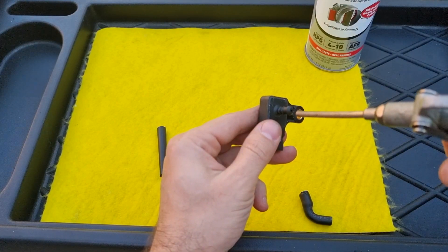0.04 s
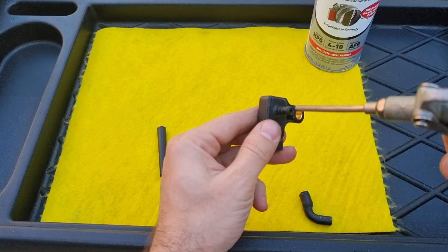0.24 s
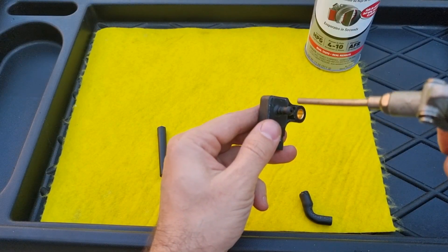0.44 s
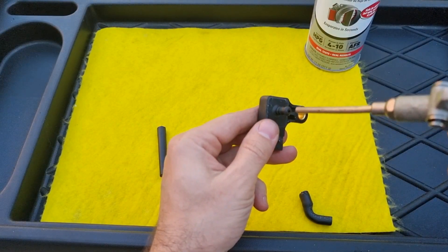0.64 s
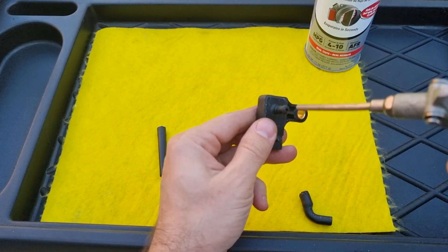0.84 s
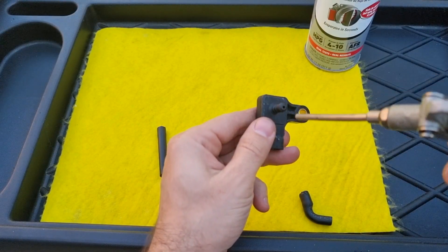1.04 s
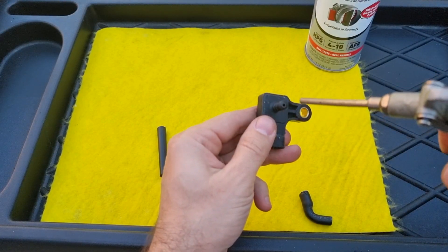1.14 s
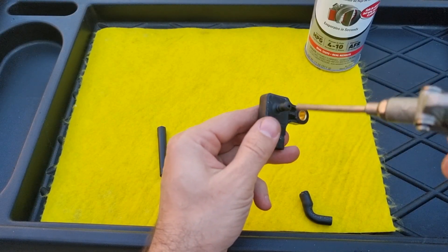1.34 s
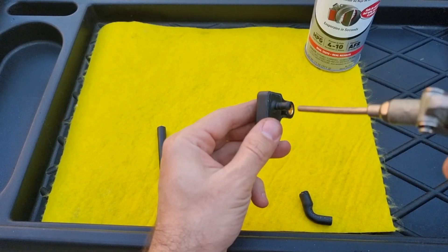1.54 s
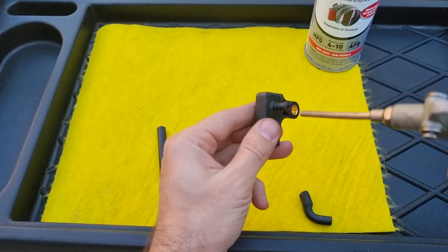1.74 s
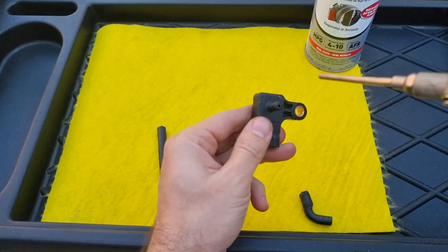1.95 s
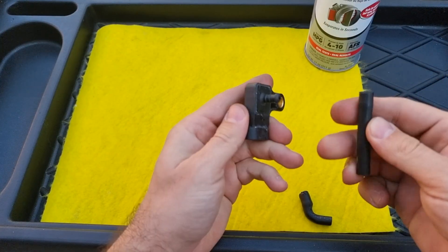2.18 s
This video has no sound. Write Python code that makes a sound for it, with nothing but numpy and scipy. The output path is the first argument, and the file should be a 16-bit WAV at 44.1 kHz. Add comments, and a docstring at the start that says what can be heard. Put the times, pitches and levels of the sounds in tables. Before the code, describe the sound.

Close up in a small garage, three strong bursts of pressurised air hiss and fizz with quick flicker and soft low pops, stopping sharply between; afterwards only quiet hum, low rumble and a light tap remain.

```python
"""A blow gun puffs three blasts of compressed air at a small plastic part: filtered noise shaped by a valve.
The jet roars softly, hisses and fizzes as it is waved about, and once sings over the part's open port;
each part of the jet is a band of noise with its own flickering level. Decaying sines make low pops and a tap.
A diffuse noise tail makes the garage; machine hum, broadband noise, late rumble and a thin tone fill the gaps.
The low mids and bass sink while the jet is loud and return in the gaps; the extreme treble is missing."""
import sys
import numpy as np
from scipy import signal
from scipy.fft import rfft, irfft
from scipy.io import wavfile
from scipy.ndimage import uniform_filter1d

SR = 44100
rng = np.random.default_rng(int(sys.argv[2]) if len(sys.argv) > 2 else 0)


def unload_wav(signal):
    """Save mono or channel-first audio to the path in sys.argv[1] as 16-bit WAV at rate SR, clipped to [-1, 1]."""
    wavfile.write(
        sys.argv[1],
        SR,
        np.round(np.clip(np.atleast_2d(signal).T, -1, 1) * 32767).astype(np.int16),
    )


N = 97593  # length [samples]


def undb(db):
    """Level law: decibels to an amplitude ratio."""
    return 10 ** (np.asarray(db) / 20)


def level(x, db):
    """Energy normalisation: scale to an rms level [dB]."""
    return x * undb(db) / np.sqrt(np.mean(x ** 2))


def bin_frequencies():
    """Fourier analysis: the frequency [Hz] of each spectral bin."""
    return np.arange(N // 2 + 1) * SR / N


def shape(x, points, lo_hz=0, hi_hz=SR, lifts=()):
    """Spectral filtering: colour by (frequency [Hz], level [dB]) points and resonances in a soft-edged band."""
    f = bin_frequencies() + 1e-3  # keeps the logarithm finite
    p = np.array(points, float)
    db = np.interp(np.log(f), np.log(p[:, 0]), p[:, 1])
    for centre_hz, width_hz, lift_db in lifts:
        db = db + lift_db / (1 + (2 * (f - centre_hz) / width_hz) ** 2)
    edge = 1 / np.sqrt((1 + (lo_hz / f) ** 24) * (1 + (f / hi_hz) ** 24))
    return irfft(rfft(x) * undb(db) * edge, N)


def walk(rate):
    """Random modulation: values held 1 / rate seconds, then smoothed twice by a moving average."""
    hold = int(SR / rate)
    steps = np.repeat(rng.standard_normal(N)[:N // hold + 1], hold)
    return 1.3 * uniform_filter1d(uniform_filter1d(steps, hold), hold)[:N]


def pair(common, likeness):
    """Partial coherence: left and right share one noise and add their own."""
    c = np.clip(likeness, 0, 1)
    return np.sqrt(c) * common + np.sqrt(1 - c) * rng.standard_normal((2, N))


# spectrum of the room noise, relative: (frequency [Hz], level [dB])
FLOOR_SPECTRUM = [(30, -11.5), (110, -8), (300, -16.5), (800, -24.5), (2000, -33), (4000, -38),
                  (8000, -42.5), (14000, -53)]
FLOOR_DB = -56.5


def room_noise():
    """Broadband noise: a steady random pressure with a falling spectrum."""
    return level(shape(pair(rng.standard_normal(N), 0.29), FLOOR_SPECTRUM), FLOOR_DB)


HUM_HZ, HUM_DB, HUM_WAVER_DB, HUM_LEAD_RAD = 74.7, -56.5, 2.2, .6


def machine_hum(t):
    """Modulated sinusoid: a low tone wavers in phase and level, its phase ahead on the left."""
    phase = 2 * np.pi * HUM_HZ * t + .4 * walk(6) + np.array([[HUM_LEAD_RAD], [0]])
    return np.sqrt(2) * np.sin(phase) * undb(HUM_DB + HUM_WAVER_DB * walk(12))


RUMBLE_S, RUMBLE_HZ, RUMBLE_DB = 1.92, 50, -51.5  # start, upper edge, level once faded in


def handling_rumble(t):
    """Low-frequency noise: a narrow band fades in as the gun is lifted away."""
    noise = shape(rng.standard_normal(N), [(20, 0), (99, 0)], 19, RUMBLE_HZ)
    return level(noise, RUMBLE_DB) * np.clip((t - RUMBLE_S) / 0.04, 0, 1)


# faint tone after the last blast: (start [s], length [s], level before the left and right gains [dB])
THIN_TONES = [(1.967, 0.034, -70), (2.022, 0.13, -68.5)]
TONE_HZ = 1094


def thin_tone(t):
    """Gated sinusoid: a pure tone with short linear ramps, stronger on the right."""
    gate = 0
    for start, length, db in THIN_TONES:
        gate = gate + undb(db) * np.clip(np.minimum(t - start, start + length - t) / 0.0053, 0, 1)
    tone = np.sqrt(2) * gate * np.sin(2 * np.pi * TONE_HZ * t)
    return tone * np.array([[.6], [1.4]])


# modes of the light tap: (frequency [Hz], level relative to TAP_DB [dB], 60 dB decay time [s])
TAP_MODES = [(726, 0.5, 0.066), (1060, 4, 0.012), (2400, -6, 0.0099)]
TAP_S, TAP_DB = 2.12, -50  # level before the left and right gains


def tap(t):
    """Modal decay: a struck body rings in exponentially damped sines, mostly on the left."""
    u = np.maximum(t - TAP_S, 0)
    ring = sum(undb(TAP_DB + db - 60 * u / t60) * np.sin(2 * np.pi * f * u) for f, db, t60 in TAP_MODES)
    return ring * np.array([[1.6], [.2]])


ROOM_DB, ROOM_T60_S, ROOM_RISE_S, ROOM_TOP_HZ = -20.5, 0.23, 0.014, 14000


def room(x, t):
    """Diffuse reverberation: convolution with decaying noise, independent in each channel."""
    tail = rng.standard_normal((2, N)) * undb(-60 * t / ROOM_T60_S) * np.clip(t / ROOM_RISE_S, 0, 1)
    tail = signal.sosfilt(signal.butter(1, ROOM_TOP_HZ, fs=SR, output="sos"), tail)
    tail = tail / np.sqrt(np.sum(tail ** 2, axis=1, keepdims=True))  # unit energy
    mono = x.mean(axis=0)[None]
    return undb(ROOM_DB) * signal.fftconvolve(mono, tail, axes=1)[:, :N]


# low pops: (time before POP_LATE_S is added [s], gain [dB], left minus right [dB])
LOW_POPS = [(.198, -44.5, 12), (0.482, -50, 0), (0.675, -46.5, 16), (.816, -39.5, 16), (0.963, -43, 10),
            (1.044, -45, 18), (1.166, -47.5, 17), (1.365, -43.5, 19), (1.61, -36.5, 9), (1.725, -40, 11.5),
            (1.83, -43, 1)]
POP_HZ, POP_WIDTH_S, POP_LATE_S = 270, .0013, .006


def pops(t):
    """Transient pulse: a Gaussian-windowed sine, then a damped low after-swing, mostly on the left."""
    out = 0
    for s, db, pan_db in LOW_POPS:
        u = t - s - POP_LATE_S
        thump = np.sin(2 * np.pi * POP_HZ * u) * np.exp(-.5 * (u / POP_WIDTH_S) ** 2)
        after_swing = np.sin(2 * np.pi * 100 * u) * (u > 0) * np.exp(-np.abs(u) / .01)
        out = out + (thump + after_swing) * undb(db + np.array([[pan_db], [-pan_db]]) / 2)
    return out


# trigger: (valve opens [s], valve starts to shut [s])
BLASTS = [(-.02, 0.4836), (0.671, 1.1693), (1.347, 1.822)]
LEAK_S, LEAK_FROM_DB, LEAK_DB = 0.032, -53.5, -17  # leak length, first and last opening
SNAP_S, SHUT_KNEE_S, SHUT_DB_PER_S = .009, 0.0049, 1093.5  # the fall approaches this slope


def valve(t):
    """Flow control: a creeping leak, a snap open, then a fall that steepens as the trigger is let go [dB]."""
    openings_db = []
    for on, off in BLASTS:
        rise_db = np.interp(t, [on - LEAK_S, on, on + SNAP_S], [LEAK_FROM_DB, LEAK_DB, 0], left=-200)
        fall_s = np.hypot(np.maximum(t - off + SHUT_KNEE_S, 0), SHUT_KNEE_S) - SHUT_KNEE_S
        openings_db.append(rise_db - SHUT_DB_PER_S * fall_s)
    return np.max(openings_db, axis=0)


# spectrum of the jet noise, relative: (frequency [Hz], level [dB])
JET_SPECTRUM = [(180, -65), (300, -20), (612, -23), (860, -18.5), (1420, -17.5), (2000, -15.5), (2460, -16),
                (2900, -7.5), (3240, -9.5), (4790, -5), (5630, -4.5), (6100, 1.5), (10800, -6.5),
                (14400, -2)]
SING_S, SING_RISE_S, SING_FALL_S, SING_HZ = 1.625, .012, .035, 2200
SING_DB = -32  # rms before the swell


def sing(t):
    """Cavity tone: noise in a narrow band swells briefly as the jet crosses the port."""
    u = t - SING_S
    swell = np.exp(-np.where(u < 0, u / SING_RISE_S, u / SING_FALL_S) ** 2)
    band = shape(pair(rng.standard_normal(N), .6), JET_SPECTRUM, SING_HZ / 1.2, SING_HZ * 0.99)
    return level(band, SING_DB) * swell


# jet waved over the part, one list per blast; levels before flicker and valve:
# (time [s], port hiss level [dB], edge hiss level [dB], nozzle fizz level [dB])
SWEEP = [
    [(0.0, -30.5, -28, -32.5), (0.05, -25, -18.5, -39.5), (0.13, -28.5, -17, -31), (0.2, -30.5, -25, -39.5),
     (0.218, -31, -27, -29.5), (0.228, -33.5, -30.5, -36.5), (0.254, -33, -29, -36.5),
     (0.274, -28.5, -22, -43.5), (0.29, -31, -19.5, -34), (0.36, -29, -27.5, -35.5),
     (0.386, -28, -18.5, -33), (0.426, -27, -21.5, -32), (0.45, -33, -26.5, -37.5)],
    [(0.685, -34, -27, -27), (0.745, -24.5, -21.5, -29), (0.793, -27, -17, -37),
     (0.815, -27.5, -25.5, -27.5), (0.857, -26, -19, -21), (0.879, -33.5, -26.5, -31.5),
     (0.923, -26.5, -19, -31), (1.033, -26, -20.5, -31), (1.059, -30.5, -26.5, -28),
     (1.073, -26.5, -20.5, -35.5), (1.111, -26.5, -17, -27.5), (1.155, -27.5, -21, -39.5)],
    [(1.36, -31.5, -22.5, -36.5), (1.376, -26.5, -20, -30.5), (1.392, -33, -27.5, -32),
     (1.43, -24.5, -17.5, -23.5), (1.468, -28, -28, -36), (1.492, -25.5, -17.5, -20),
     (1.506, -30, -23, -35), (1.568, -23.5, -18, -27), (1.596, -30.5, -25.5, -30), (1.616, -30, -23.5, -26),
     (1.63, -25.5, -20.5, -37), (1.696, -30, -23, -32.5), (1.814, -24.5, -17.5, -39)],
]
# low roar before flicker and valve: (time [s], level [dB])
ROAR = [(.02, -36), (.3, -38.5), (.75, -34.5), (1.12, -36.5), (1.45, -35), (1.68, -35.5)]
# lowest part of the roar, in lumps, before flicker and valve: (time [s], level [dB])
FLUTTER = [(.06, -71.5), (.12, -57), (.29, -66), (.33, -56), (.79, -56), (.86, -52.5), (1.12, -61.5),
           (1.44, -53), (1.48, -55.5), (1.512, -48), (1.58, -56)]
# port hiss, edge hiss, nozzle fizz, roar, lowest roar: (low edge [Hz], high edge [Hz],
# flicker [dB], left-right likeness [0-1], left minus right before the swing is added [dB])
JET_PARTS = [(2730, 5045, 1.23, 0.6, -2.4), (5430, 13500, 1.5, 0.51, -0.5), (12700, 12600, 0.5, 0, -3.5),
             (606, 2783, 1.5, 0.52, -2.4), (263, 548, 3, 0.07, 2.5)]
# hollows of the part that the air excites: (frequency [Hz], width [Hz], lift [dB])
HOLLOWS = [(7370, 140, 4.5), (8700, 1200, 5), (10670, 990, 8.5), (14400, 220, 8.5)]
# balance added as the nozzle swings: (time [s], left minus right [dB])
SWING = [(.1, -0.5), (1, 0.2), (1.8, -1)]
FLICKERS_PER_S, FLUTTERS_PER_S = 60, 24  # the slower rate is for the lowest part
LEFT_LEAD_RAD, LEAD_SWAY_RAD, LEAD_SWAY_HZ = 0.11, .6, 2475  # the lead sways along the spectrum
LEAK_FIZZ_DB = 5  # the leak is brighter than the open jet


def jet(t):
    """Turbulent mixing: five bands of noise flicker independently and pass through one valve."""
    sweep = np.concatenate([np.array(blast, float) for blast in SWEEP])
    levels_db = [np.interp(t, sweep[:, 0], column) for column in sweep.T[1:]]
    levels_db += [np.interp(t, *np.array(curve, float).T) for curve in (ROAR, FLUTTER)]
    leaking = sum((t > on - LEAK_S) & (t < on) for on, off in BLASTS)
    levels_db[2] = levels_db[2] + LEAK_FIZZ_DB * leaking
    rates = [FLICKERS_PER_S] * 4 + [FLUTTERS_PER_S]
    lead = LEFT_LEAD_RAD + LEAD_SWAY_RAD * np.sin(2 * np.pi * bin_frequencies() / LEAD_SWAY_HZ)
    swing_db = np.interp(t, *np.array(SWING, float).T)
    out = 0
    for db, rate, (lo, hi, flicker_db, likeness, pan_db) in zip(levels_db, rates, JET_PARTS):
        left, right = pair(rng.standard_normal(N), likeness)
        both = np.array([left, irfft(rfft(right) * np.exp(-1j * lead), N)])
        lean_db = pan_db + swing_db
        hiss = level(shape(both, JET_SPECTRUM, lo, hi, HOLLOWS), 0)
        hiss = hiss * undb(np.array([lean_db, -lean_db]) / 2)
        out = out + hiss * undb(db + flicker_db * walk(rate))
    return out * undb(valve(t))


def scene():
    """Superposition: the background, pops, jet and the jet's room tail add linearly."""
    t = np.arange(N) / SR
    air = jet(t) + sing(t)
    garage = room_noise() + machine_hum(t) + handling_rumble(t) + thin_tone(t) + tap(t)
    return air + room(air, t) + pops(t) + garage


LOW_MID_LO_HZ, LOW_MID_HI_HZ, LOUDNESS_WINDOW_S = 140, 300, .03
SINK_ABOVE_DB, LOW_MID_SINK_DB_PER_DB, BASS_SINK_DB_PER_DB = -22, 4.0, 1.3
TOP_HZ = 14480


def record(dry):
    """Level-dependent filtering: low mids and bass sink while the jet is loud; a low-pass ends the treble."""
    power = uniform_filter1d(np.mean(dry ** 2, axis=0), int(LOUDNESS_WINDOW_S * SR))
    over_db = np.maximum(10 * np.log10(power + 1e-12) - SINK_ABOVE_DB, 0)
    flat = [(20, 0.0067), (999, 0)]  # nearly level response
    low_mids = shape(dry, flat, LOW_MID_LO_HZ, LOW_MID_HI_HZ)
    bass = shape(dry, flat, 0, LOW_MID_LO_HZ)
    wet = dry - low_mids * (1 - undb(-LOW_MID_SINK_DB_PER_DB * over_db))
    wet = wet - bass * (1 - undb(-BASS_SINK_DB_PER_DB * over_db))
    return signal.sosfilt(signal.ellip(12, .2, 70, TOP_HZ, fs=SR, output="sos"), wet)


dry = scene()
out = record(dry)
unload_wav(out)
```